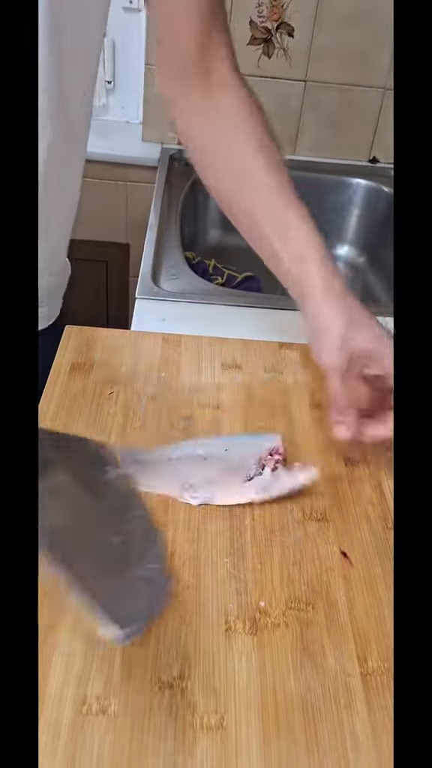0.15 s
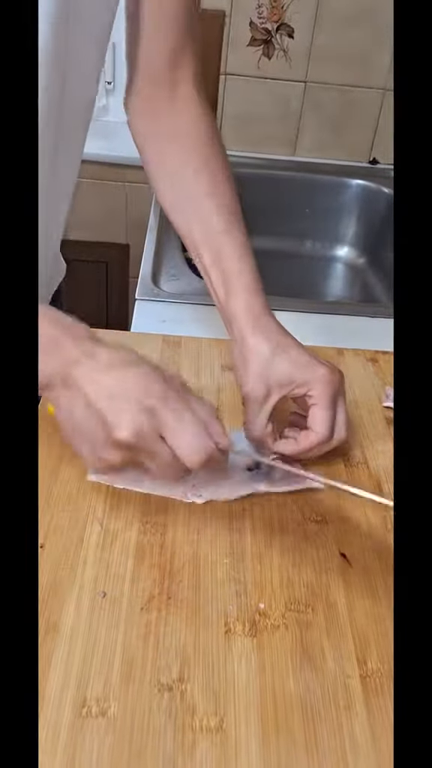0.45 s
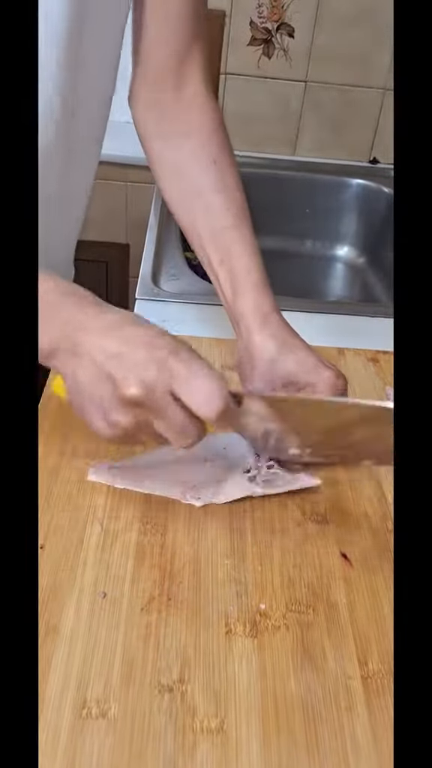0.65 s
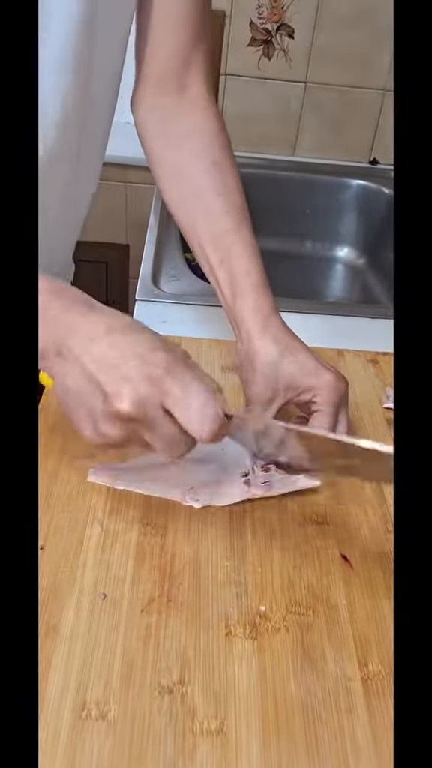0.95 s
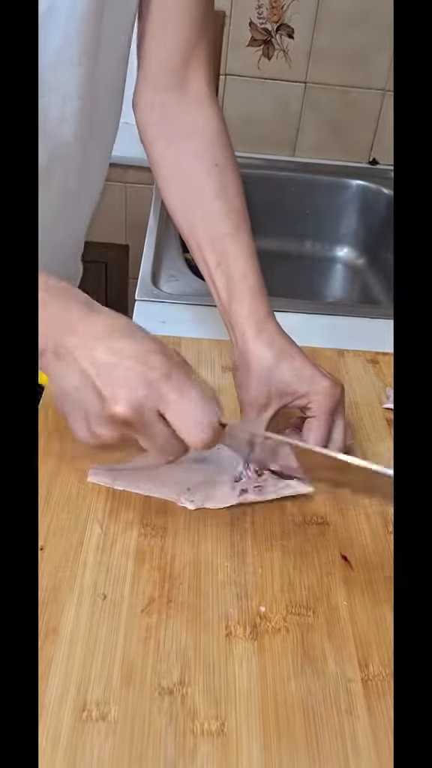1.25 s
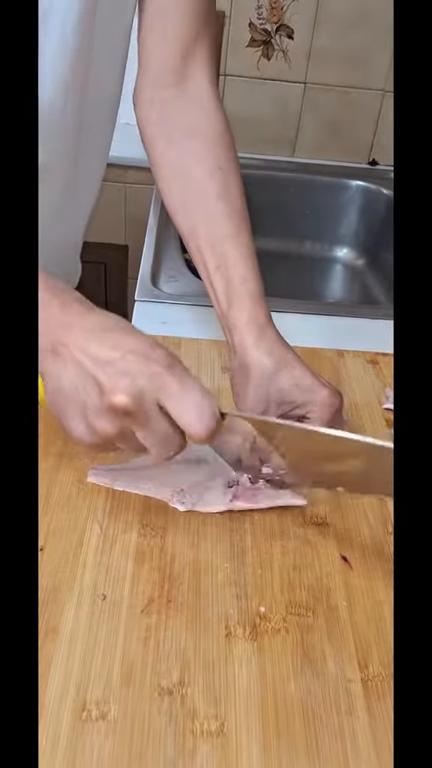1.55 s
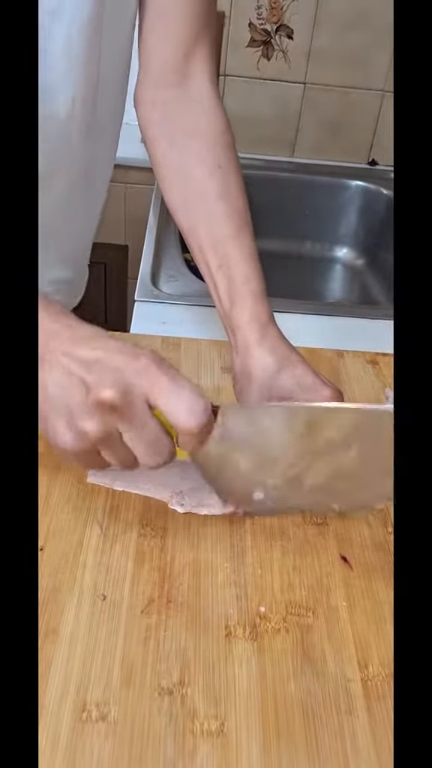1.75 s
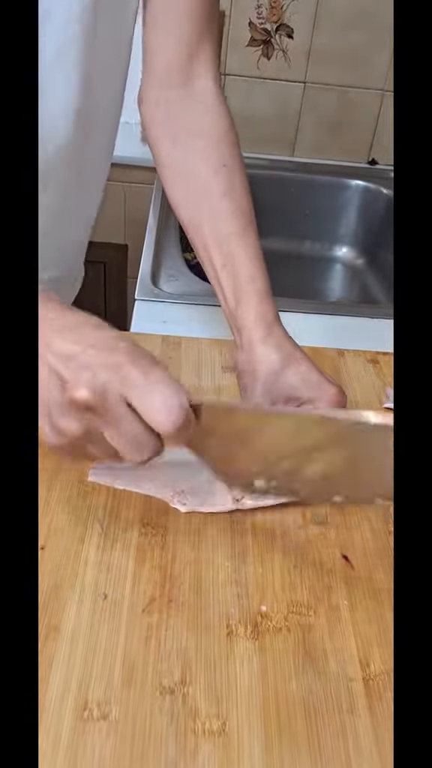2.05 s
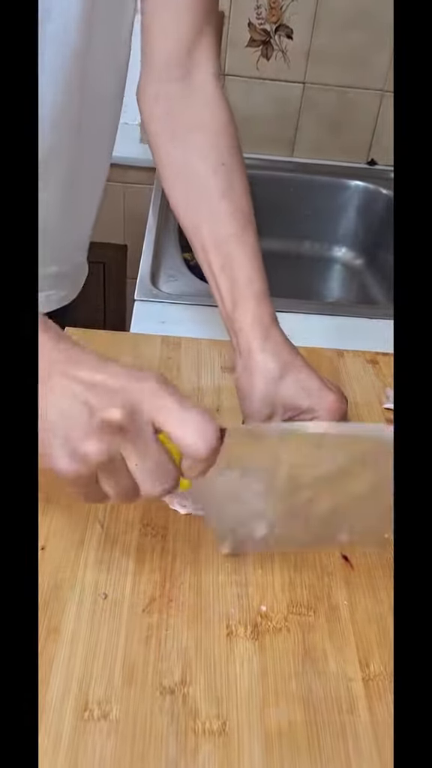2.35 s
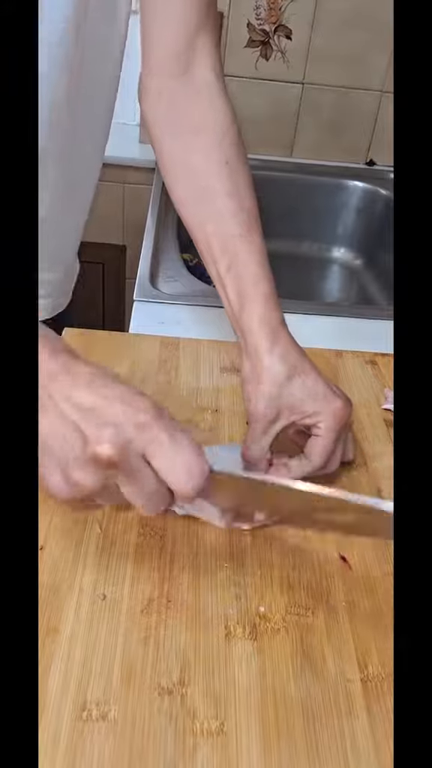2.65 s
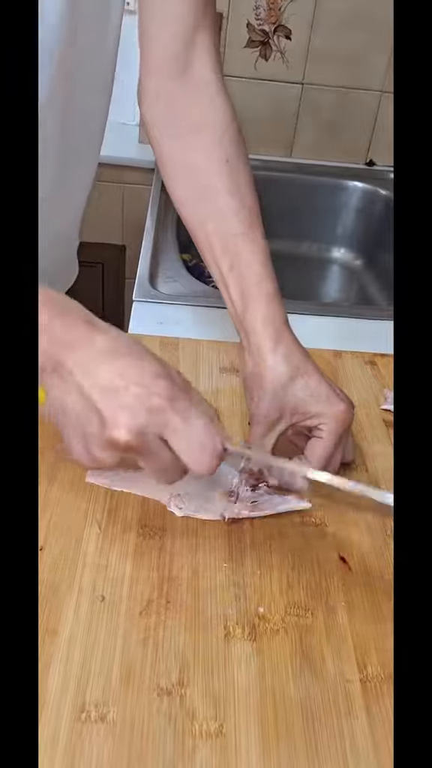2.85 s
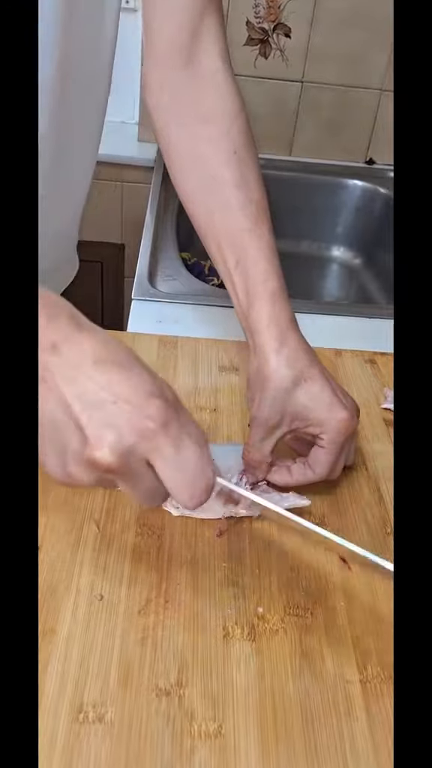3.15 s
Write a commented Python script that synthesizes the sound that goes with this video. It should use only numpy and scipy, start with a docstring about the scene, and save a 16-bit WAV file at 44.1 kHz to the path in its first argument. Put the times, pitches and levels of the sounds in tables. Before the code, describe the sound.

A cleaver slices a fish fillet with noisy rasping strokes, wet ticks and thumps on a wooden board.

```python
"""In a small tiled kitchen hands rustle low over faint room noise, then a fish fillet slaps onto a wooden board.
From 0.37 s a cleaver slices it: wet ticks and low thumps of the board, then noisy rasps made of random snaps.
The strokes set the blade's damped modes ringing faintly. From 1.66 s the edge also knocks on the wood.
Two microphones hear it: the right one is nearer the cut, the left one faces away and hears more echo."""
import sys
import numpy as np
from scipy import signal
from scipy.fft import rfft, irfft
from scipy.io import wavfile
from scipy.ndimage import uniform_filter1d

SR = 44100
rng = np.random.default_rng(int(sys.argv[2]) if len(sys.argv) > 2 else 0)


def master_out(mix):
    """Clip the mix to full scale and print it as 16-bit PCM to the path in sys.argv[1]."""
    frames = np.transpose(np.atleast_2d(mix))
    ceiling = np.clip(frames, -1, 1)
    pcm = np.round(ceiling * 32767).astype(np.int16)
    wavfile.write(sys.argv[1], SR, pcm)


N = 145530

TICK_S, TICK_SPIKE = 0.0024, 3.1  # decay of a wet contact's tail, height of its first sample


def amp(db):
    """Decibels to gain."""
    return 10 ** (np.asarray(db) / 20)


def evened(x):
    """Scales to rms 1."""
    return x / np.sqrt(np.mean(x ** 2) + 1e-20)


def unit(x):
    """Scales to energy 1."""
    return x / np.sqrt(np.sum(x ** 2) + 1e-20)


def read(points, hz):
    """Reads a table on a log-frequency axis."""
    f, value = np.transpose(points)
    return np.interp(np.log(hz + 1), np.log(f + 1), value)


def add(mix, s, sound):
    """Adds a sound at a time in seconds, cut off at the end of the mix."""
    part = mix[max(round(s * SR), 0):][:len(sound)]
    part += sound[:len(part)]


def colour(x, points, tilt_db=0, size=4096):
    """Causal (minimum-phase) filter with the given spectrum, tilted about 4 kHz in dB per octave."""
    hz = abs(np.fft.fftfreq(size, 1 / SR))
    octaves = np.log2(np.maximum(hz, 1000) / 4000)  # the tilt stops below 1 kHz
    log_gain = np.log(amp(read(points, hz) + tilt_db * octaves))
    taps = np.fft.ifft(np.exp(np.conj(signal.hilbert(log_gain)))).real
    return signal.fftconvolve(x, taps[:size // 2])


def flatten(x, size):
    """Evens out the broad colour of a short response and gives it energy 1."""
    z = rfft(x, 2 * len(x))
    broad_power = uniform_filter1d(abs(z) ** 2, size=size)
    return unit(irfft(z / np.sqrt(broad_power + 1e-12))[:len(x)])


def burst(decay_s, spike=0, size=1024):
    """A sharp contact with a short random tail and an even spectrum."""
    x = rng.standard_normal(size) * np.exp(-np.arange(size) / SR / decay_s)
    x[0] += spike
    return flatten(x, size=31)


def shifting(x):
    """Lets patches of the spectrum swell and fade at random, as the contact moves."""
    patch_db, patch_hz, patch_s = 3.5, 404, 0.031  # rms swing and blur of the patches
    z = signal.stft(x, nperseg=512)[2]
    # conjugate axes of the spectrogram, in cycles per Hz and cycles per second
    per_hz = np.fft.fftfreq(z.shape[0], SR / 512)[:, None]
    per_s = np.fft.fftfreq(z.shape[1], 256 / SR)
    blur = np.exp(-2 * ((per_hz * patch_hz) ** 2 + (per_s * patch_s) ** 2))
    noise = rng.standard_normal(z.shape)
    patches = evened(np.fft.ifft2(np.fft.fft2(noise) * blur).real)
    return signal.istft(z * amp(patch_db * patches))[1][:len(x)]


def crackle(count):
    """Tiny snaps of uneven size, fibres parting, over smooth friction; the edge catches and slips."""
    snaps_per_s, spread_db, smooth_share = 3000, 3.5, 0.59
    grip_db, grip_s = 0.65, 0.0041  # rms swing of the level, smoothing time
    size = amp(spread_db * np.minimum(rng.exponential(1, count), 4.5))
    snaps = size * rng.choice([-1, 1], count) * (rng.random(count) < snaps_per_s / SR)
    slow = np.exp(-(np.fft.rfftfreq(count, 1 / SR) * grip_s) ** 2)
    grip = evened(irfft(rfft(rng.standard_normal(count)) * slow, count))
    friction = smooth_share * rng.standard_normal(count)
    return shifting((evened(snaps) + friction) * amp(grip_db * grip))


def background():
    """Faint room noise and the low rustle of hands and fish on the board, partly shared by the microphones."""
    # spectrum of the room noise: f/Hz, relative level/dB
    floor = [(25, -14), (117, -17.5), (293, -18), (575, -29), (1330, -34), (2480, -16), (3900, -70),
             (4450, -10), (5100, -34), (16000, -44)]
    # spectrum of the rustle: f/Hz, relative level/dB per Hz
    handling = [(25, -19), (60, 6), (110, 10.5), (160, 4), (350, -4.5), (800, -12), (1500, -21.5),
                (8000, -40.5)]
    # the rustle as it comes and goes: t/s, level/dB
    handling_level = [(0, -52.5), (0.131, -44), (0.311, -71), (.45, -54.5), (.67, -66.5), (0.848, -55),
                      (1.0, -57), (1.12, -49), (1.26, -69), (1.45, -53), (1.85, -57), (2.05, -50.5),
                      (2.148, -59), (2.3, -42), (2.48, -62), (2.72, -71), (3.0, -38), (3.3, -58)]
    floor_db = -78
    air = np.array([evened(colour(rng.standard_normal(N), floor)[:N]) for side in range(2)])
    left, right, both = [evened(colour(rng.standard_normal(N), handling)[:N]) for part in range(3)]
    level = amp(np.interp(np.arange(N) / SR, *np.transpose(handling_level)))
    room_noise = amp(floor_db) * evened(air + .5 * air[::-1])
    rustle = level * evened(both + 0.37 * np.array([left, right]))
    return room_noise + rustle


def wet_contacts():
    """Ticks where fish or blade first touch, each led in by a swelling squeeze, and the fillet's squelch."""
    # wet contacts of fish and blade: t/s, energy level/dB, treble tilt/dB per octave
    ticks = [(0.0478, -6.5, 1), (0.3659, -26.5, -3.5), (.426, -23, -1.5), (0.7044, -8, 3.5),
             (1.0045, -1.5, 3), (1.295, -7.5, 2.5), (1.492, -12.5, 6), (1.5786, -4, 3.5), (1.8577, -0.5, 2),
             (1.916, -8, -1), (2.184, -4.5, 1), (2.318, -16, 8), (2.530, -10.5, 1.5), (2.6655, -3.5, -3.5),
             (3.0172, 2, -3), (3.24, -10, 6.5)]
    # spectrum of a wet contact: f/Hz, relative level/dB
    wet_colour = [(100, -33), (600, 12), (1200, 4.5), (2400, 11.5), (4200, 1), (5500, 7), (6600, -2),
                  (8200, 5.5), (11000, -0.5), (15000, 3)]
    lead_in_s, lead_in_db = 0.0039, -14.5  # rise time, energy level against the tick
    splat_s, splat_db, splat_fade_s, splat_tilt_db = .056, -36, 0.046, 1.2  # the wet fillet settles
    out, t = np.zeros(N), np.arange(SR // 4) / SR
    for s, db, tilt_db in ticks:
        tick = unit(colour(burst(TICK_S, TICK_SPIKE), wet_colour, tilt_db))
        add(out, s, amp(db) * tick)
        squeeze = burst(lead_in_s)[::-1]
        lead_in = unit(colour(squeeze, wet_colour, tilt_db))
        add(out, s - len(squeeze) / SR, amp(db + lead_in_db) * lead_in)
    squelch = evened(colour(crackle(count=len(t)), wet_colour, splat_tilt_db)[:len(t)])
    add(out, splat_s, amp(splat_db) * squelch * np.exp(-t / splat_fade_s))
    return out


def slap():
    """The fillet lands flat on the board and air pops out from under it: one coloured burst."""
    # spectrum of the pop: f/Hz, relative level/dB per Hz
    pop_colour = [(100, -17), (600, -5), (1300, -19.5), (2000, -27), (2480, 0), (3000, -34.5), (6000, -23),
                  (15000, 6)]
    slap_s, slap_db = .047, 5
    out = np.zeros(N)
    pop = unit(colour(burst(TICK_S, TICK_SPIKE), pop_colour))
    add(out, slap_s, amp(slap_db) * pop)
    return out


def nearby(x, early_db):
    """The direct sound and its first echoes off board, hand and counter."""
    early_s = 0.003  # decay of the echoes
    t = np.arange(SR // 20) / SR
    echo = amp(early_db) * unit(rng.standard_normal(len(t)) * (t > .0005) * np.exp(-t / early_s))
    echo[0] = 1  # direct sound
    return signal.fftconvolve(x, flatten(echo, size=7))[:N]


def kitchen(x):
    """The tail of a small tiled room at one microphone: noise that dies at its own rate in each band."""
    # reverberation: f/Hz, t60/s
    room_t60 = [(150, 0.47), (600, 0.31), (2000, 0.27), (5000, 0.31), (9000, 0.26), (15000, 0.25)]
    room_db, build_s = -3, 0.0016
    t = np.arange(SR * 2 // 3) / SR
    longest = np.max(np.transpose(room_t60)[1])
    envelope = (1 - np.exp(-t / build_s)) * amp(-60 * t / longest)
    tail = flatten(rng.standard_normal(len(t)) * envelope, size=81)
    hz, at, z = signal.stft(tail, SR, nperseg=256)
    faster = 1 / read(room_t60, hz)[:, None] - 1 / longest  # extra decay of the shorter bands
    tail = signal.istft(z * amp(-60 * at * faster), SR)[1]
    return amp(room_db) * signal.fftconvolve(x, unit(tail))[:N]


def board():
    """Each push gives a brief low boom with a hum after it, higher modes and a dull rumble."""
    # pushes: t/s, boom level/dB, hum drive/dB, drive of modes and rumble/dB, boom f/Hz
    thumps = [(0.052, -50.5, -43, -56, 99.4), (0.425, -32, -21, -69, 89.7), (0.7021, -27, -14, -42, 90.6),
              (1.006, -33, -29.5, -49, 92.2), (1.295, -42, -26, -52, 89), (1.385, -36, -26, -45.5, 89),
              (1.577, -41, -26, -57, 91), (1.664, -43, -23, -46.5, 103.5), (1.859, -20.5, -14.5, -27, 88.9),
              (2.185, -30, -36, -30, 87.2), (2.271, -47, -25, -37, 89), (2.53, -30, -14.5, -40, 90),
              (2.60, -48, -27, -37, 102), (2.667, -29, -17.5, -31, 91.8), (3.008, -17.5, -16, -25, 91),
              (3.24, -40.5, -38, -54, 93)]
    # low modes of the room, set going by each thump: f/Hz, relative level/dB, t60/s
    room_modes = [(134.8, -8.5, 0.41), (159.7, -3, 0.32), (196.7, -4.5, 0.18), (234, -8, 0.54),
                  (289.9, -6, 0.33), (338, -15, 0.37), (363, -13.5, 0.37), (444, -15, 0.12),
                  (609, -26, 0.34)]
    # spectrum of the rumble: f/Hz, relative level/dB per Hz
    rumble_colour = [(30, -22), (80, 4), (150, 5.5), (320, 3.5), (500, -11), (800, -10.5), (1500, -31),
                     (8000, -66)]
    boom_rise_s, boom_hold_s, boom_fade_s, boom_sag_s = 0.0068, 0.08, 0.023, 0.11
    # the counter takes up the boom and hums on
    hum_hz, hum_gain_db, hum_rise_s, hum_fade_s = 117.7, -2.5, 0.067, 0.051
    modes_rise_s, rumble_db, rumble_s = 0.0054, -6.5, 0.056
    out, t = np.zeros(N), np.arange(SR * 2 // 3) / SR
    fall = np.exp(-t / boom_sag_s - np.maximum(t - boom_hold_s, 0) / boom_fade_s)
    swell = np.minimum(t / boom_rise_s, 1) * fall
    hum_swell = (1 - np.exp(-t / hum_rise_s)) ** 2 * np.exp(-t / hum_fade_s)
    hum = amp(hum_gain_db) * hum_swell * np.sin(2 * np.pi * hum_hz * t)
    onset = np.minimum(t / modes_rise_s, 1)
    for s, boom_db, hum_db, modes_db, hz in thumps:
        modes = sum(amp(db - 60 * t / t60) * np.sin(2 * np.pi * f * t + rng.uniform(0, 2 * np.pi))
                    for f, db, t60 in room_modes)
        noise = evened(colour(rng.standard_normal(len(t)), rumble_colour)[:len(t)])
        rumble = amp(rumble_db) * noise * np.exp(-t / rumble_s)
        boom = amp(boom_db) * swell * np.cos(2 * np.pi * hz * t)
        add(out, s, boom + amp(hum_db) * hum + amp(modes_db) * onset * (modes + rumble))
    return out


def tears(count):
    """Coarser fibres give way one by one: separate, duller snaps at uneven intervals."""
    # spectrum of a tear: f/Hz, relative level/dB per Hz
    tear_colour = [(100, -14), (800, -1.5), (1150, -0.5), (1650, 3.5), (2600, 5.5), (3600, 0.5), (6000, 0),
                   (15000, -12)]
    tears_per_s, tear_db = 170, -6.5  # mean rate, level against the finer grit
    at = np.cumsum(rng.exponential(SR / tears_per_s, count)).astype(int)
    at = at[at < count]
    snaps = np.zeros(count)
    size = rng.uniform(.4, 1, count) * rng.choice([-1, 1], count)
    snaps[at] = size[:len(at)]
    return amp(tear_db) * evened(colour(snaps, tear_colour)[:count])


def rasps():
    """The edge drags lightly, bites into the skin, and stops; gives the sound and the blade's share of it."""
    # slicing strokes: start t/s, end t/s, drag level/dB, deepest bite t/s, bite half-width/s,
    # bite level/dB, treble tilt/dB per octave, drive to the blade/dB
    strokes = [(0.367, 0.545, -57.5, .518, 0.031, -40, 0, -3),
               (0.702, 0.834, -46, .797, 0.041, -38, -1.5, -8),
               (1.005, 1.124, -46.5, 1.094, 0.022, -36, -1.5, -3),
               (1.3, 1.447, -45.5, 1.41, 0.046, -39, -1, 0.5),
               (1.575, 1.671, -50, 1.657, 0.0066, -32.5, -1, 3.5),
               (1.745, 1.834, -53.5, 1.815, 0.019, -41, 4, 7),
               (1.857, 1.985, -64, 1.93, 0.021, -39, -1, -2.5),
               (2.185, 2.339, -47.5, 2.286, 0.036, -31.5, -1, -2),
               (2.533, 2.695, -51.5, 2.63, 0.033, -34, -1.5, 3),
               (2.771, 3.07, -51.5, 2.975, 0.054, -37.5, -1, -7),
               (3.057, 3.215, -63.5, 3.10, .03, -70, -3.5, -13),
               (3.242, 3.333, -49.5, 3.295, 0.0081, -38, 2, -2.5)]
    # spectrum of the fine grit: f/Hz, relative level/dB per Hz
    rasp_colour = [(60, -21.5), (200, -11.5), (450, -15.5), (800, -4.5), (1150, -9), (1750, 1.5), (2500, 3),
                   (3500, 1), (3900, 1), (5300, 2.5), (6800, -3.5), (7700, 2), (10000, 0), (15500, -1)]
    attack_s, release_s = 0.001, .015
    out, drive = np.zeros((2, N))
    for start, end, drag_db, bite_s, width, bite_db, tilt_db, ring_db in strokes:
        t = np.arange(start, end, 1 / SR)
        bite = amp(bite_db) * np.exp(-.5 * ((t - bite_s) / width) ** 2)
        force = np.hypot(amp(drag_db), bite)
        gate = np.clip((t - start) / attack_s, 0, 1) * np.clip((end - t) / release_s, 0, 1)
        grit = evened(colour(crackle(count=SR // 2), rasp_colour, tilt_db)[:SR // 2])
        texture = evened(grit + tears(count=SR // 2))[:len(t)]
        rasp = force * gate * texture
        add(out, start, rasp)
        add(drive, start, amp(ring_db) * rasp)
    return np.array([out, drive])


def blade(drive):
    """The hand-damped blade's modes ring with the rasps and knocks that drive its edge."""
    # modes of the blade: f/Hz, relative energy level/dB, t60/s
    blade_modes = [(822, -17, .17), (1421, -26, .35), (1897, -22, .09), (2191, -23, .18), (2566, -22, .14),
                   (3101, -24, .25), (4107, -27, .28), (4640, -28, .14), (5260, -24, .15), (6500, -25, .22),
                   (9130, -30, .25)]
    blade_db = 2
    t = np.arange(SR // 2) / SR
    ring = sum(amp(db) * unit(np.cos(2 * np.pi * hz * t) * amp(-60 * t / t60))
               for hz, db, t60 in blade_modes)
    return amp(blade_db) * signal.fftconvolve(drive, ring)[:N]


def knocks():
    """The wood answers a blow with a short hard clack; gives the sound and the blade's share of it."""
    # the edge strikes the wood: t/s, energy level/dB, treble tilt/dB per octave, drive to the blade/dB
    blows = [(1.665, -1.5, 1.5, -1.5), (2.6655, 3, 2.5, -17), (3.0065, 0, -1, -5), (3.0172, -3, 2.5, 6.5)]
    # spectrum of the clack: f/Hz, relative level/dB
    clack_colour = [(100, 5.5), (420, -2.5), (630, -3.5), (830, 8), (1150, -15.5), (1600, 10.5), (2050, -4),
                    (2500, 6.5), (3200, -1), (3580, 5), (4000, -6), (5400, -5), (7000, -7.5),
                    (15000, -12.5)]
    knock_s = 0.0025  # decay
    out, drive = np.zeros((2, N))
    for s, db, tilt_db, ring_db in blows:
        clack = amp(db) * unit(colour(burst(knock_s, spike=1), clack_colour, tilt_db))
        add(out, s, clack)
        add(drive, s, amp(ring_db) * clack)
    return np.array([out, drive])


def scene():
    """The cut is nearer the right microphone; the board's boom reaches both."""
    # left microphone's colour for the near sound and for the room: f/Hz, level/dB
    left_direct = [(100, -8.5), (550, -15), (900, 2.5), (1500, -16), (2400, -4), (3400, -4), (5500, -7.5),
                   (7500, -2.5), (8600, -14), (11000, -8), (15000, -12)]
    left_room = [(200, 4.5), (600, 1), (2000, -6), (4000, -2.5), (7800, 4), (9000, -5.5), (15000, -8)]
    # the board at the left and right microphones: f/Hz, level/dB
    board_left = [(90, 3.5), (160, 1.5), (250, -5.5), (600, -3)]
    board_right = [(90, 0.6), (160, 0), (250, -1), (600, -7)]
    left_early_db, right_early_db = -1, -5  # first echoes against the direct sound
    bass_cut_hz = 74
    edge, drive = rasps() + knocks()
    cut = edge + blade(drive) + wet_contacts() + slap()
    bass_cut = signal.butter(2, bass_cut_hz, "highpass", fs=SR, output="sos")
    boom = signal.sosfilt(bass_cut, board())
    left = colour(nearby(cut, left_early_db), left_direct)[:N]
    left = left + colour(kitchen(cut), left_room)[:N]
    left = left + colour(boom, board_left)[:N]
    right = nearby(cut, right_early_db) + kitchen(cut) + colour(boom, board_right)[:N]
    return np.array([left, right]) + background()


def record(dry):
    """The recorder's band limit: a steep low-pass at 15.9 kHz."""
    taps = signal.firwin(301, 15900, window=("kaiser", 8), fs=SR)
    return signal.oaconvolve(dry, taps[None], "same")


dry = scene()
out = record(dry)
master_out(out)
```